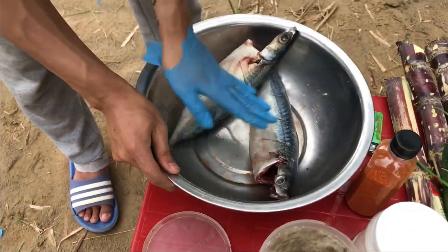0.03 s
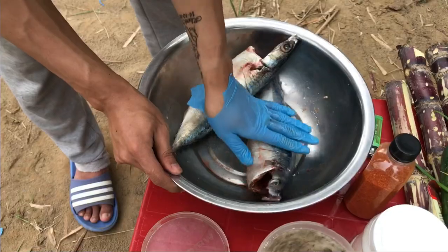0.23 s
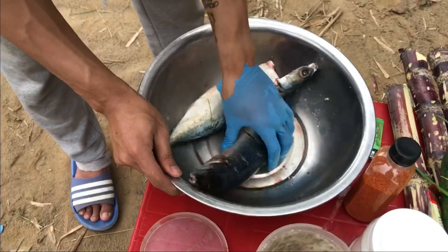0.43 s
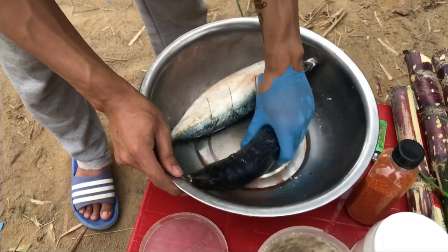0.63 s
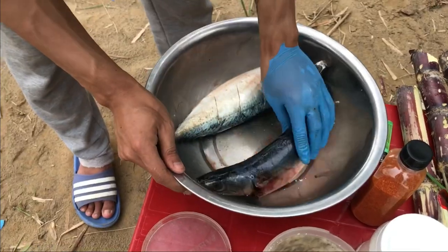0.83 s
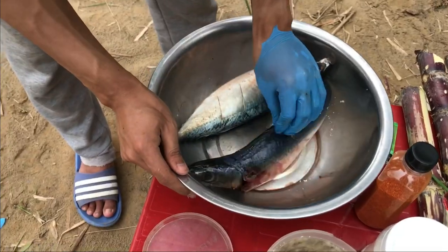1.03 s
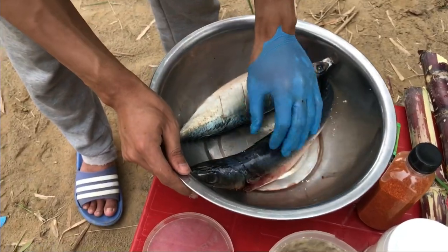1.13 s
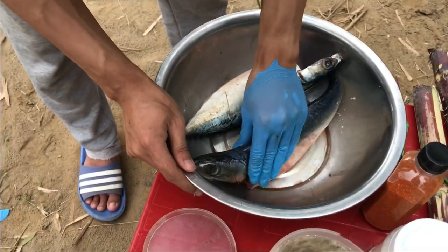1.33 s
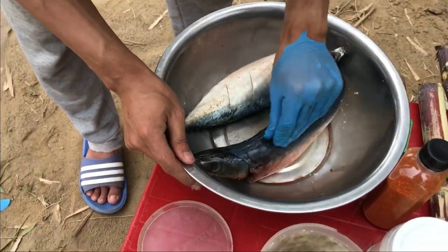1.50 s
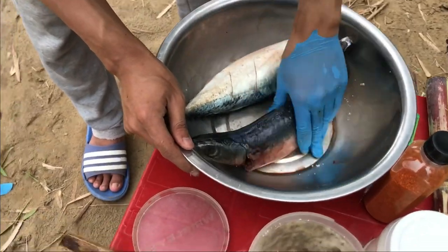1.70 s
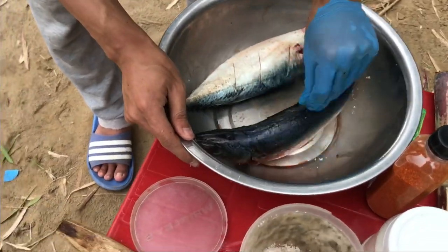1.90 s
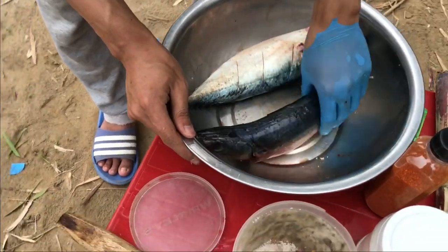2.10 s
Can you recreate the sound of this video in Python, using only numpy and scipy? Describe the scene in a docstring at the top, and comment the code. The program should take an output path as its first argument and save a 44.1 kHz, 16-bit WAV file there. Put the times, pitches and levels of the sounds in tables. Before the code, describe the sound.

A wet fish slaps down in a steel bowl twice, the first harder, each with a brief damped ring. Soft sliding, wet ticks and dull bumps come between, heard close over faint outdoor rumble and hiss.

```python
"""A yard with walls nearby: a gloved hand turns a wet fish over in a steel bowl and twice slaps it down.
Each slap is a pop of trapped air, a wet crack and a short, damped ring of the bowl. Between the slaps
the fish slides, ticks and bumps about, and the bowl thuds on the table. The walls throw back a short
echo. Underneath sit a low, wobbling boom and faint outdoor rumble and hiss."""
import sys
import numpy as np
from scipy import signal
from scipy.fft import rfft, irfft
from scipy.io import wavfile

SR = 44100
rng = np.random.default_rng(int(sys.argv[2]) if len(sys.argv) > 2 else 0)


def unload_wav(signal):
    """Save mono or channel-first audio to the path in sys.argv[1] as 16-bit WAV at rate SR, clipped to [-1, 1]."""
    wavfile.write(
        sys.argv[1],
        SR,
        np.round(np.clip(np.atleast_2d(signal).T, -1, 1) * 32767).astype(np.int16),
    )


N = 94815
T = np.arange(N) / SR


def amp(db):
    return 10 ** (np.asarray(db) / 20)


def unit_rms(x):
    return x / np.sqrt(np.mean(x ** 2))


def noise():
    return rng.standard_normal(N)


def shape(x, gain):
    """Filter by a gain that is a function of frequency."""
    hz = np.maximum(np.fft.rfftfreq(N, 1 / SR), 1)
    return irfft(rfft(x) * gain(hz), N)


def colour(x, points, tilt_db=0):
    """EQ through (Hz, dB) points, tilted per octave; rms 1."""
    hz, db = np.array(points).T
    def gain(f):
        octaves = np.log2(np.maximum(f, hz[0]))
        return amp(np.interp(np.log(f), np.log(hz), db) + tilt_db * octaves)
    return unit_rms(shape(x, gain))


def resonate(x, hz, width):
    """One steep-sided resonance, its width a share of its centre; rms 1."""
    return unit_rms(shape(x, lambda f: 1 / (1 + 1j * (f / hz - hz / f) / width) ** 2))


def wander(rate_hz):
    """Smooth random modulation; rms 1."""
    return unit_rms(shape(noise(), lambda f: np.exp(-(f / rate_hz) ** 2)))


def strike(at, rise_s, t60):
    """Envelope with a quick attack and a tail that falls 60 dB in t60 seconds."""
    age = np.maximum(T - at, 0)
    return (1 - np.exp(-age / rise_s)) * np.exp(-np.log(1000) * age / t60)


def ring(at, hz, rise_s, t60, phase=0):
    """One damped vibration."""
    return strike(at, rise_s, t60) * np.sin(2 * np.pi * hz * (T - at) + phase)


def contacts(table, rise_s, width):
    """Short noise bursts, each through one resonance."""
    return sum(amp(db) * strike(at, rise_s, t60) * resonate(noise(), hz, width)
               for at, db, hz, t60 in table)


# Tone of the outdoor rumble and hiss. Each row: frequency in Hz, relative level in dB.
RUMBLE_EQ = [(20, -17), (35, 0.5), (52, 4), (90, 2), (150, -8), (220, -11.5), (320, -26), (500, -62),
             (1000, -44.5)]
HISS_EQ = [(200, 12), (600, -2), (1200, 0.5), (2300, -6.5), (5000, -7.5), (9000, -17), (16000, -17)]
def outdoor_air():
    """A steady bed of low rumble and faint hiss."""
    return amp(-41.5) * colour(noise(), RUMBLE_EQ) + amp(-57.5) * colour(noise(), HISS_EQ)


# The yard's echo in adjoining bands. Each row: upper edge in Hz, level in dB, t60 in seconds.
ECHO_BANDS = [(451, -9.5, 0.37), (1600, -7.5, 0.28), (2700, -4, 0.23), (3900, -5.5, 0.32),
              (10400, -5, 0.27), (19000, -6, 0.34)]
def yard_echo(x):
    """Nearby walls return dense reflections that die away quickly."""
    response, low_hz = 0, 107.5
    for high_hz, db, t60 in ECHO_BANDS:
        band = shape(noise(), lambda f: (f >= low_hz) & (f < high_hz))
        tail = band * strike(at=0.0038, rise_s=0.0017, t60=t60)
        unity_gain = np.sqrt(2 * (high_hz - low_hz) / SR / np.sum(tail ** 2))
        response += amp(db) * unity_gain * tail
        low_hz = high_hz
    return signal.fftconvolve(x, response)[:N]


# Level curve of the boom. Each row: time in seconds, level in dB.
BOOM_LEVELS = [(0, -42.5), (0.05, -38.5), (0.2, -47.5), (0.25, -30.5), (0.32, -32), (0.36, -39.5),
               (0.53, -40.5), (0.6, -80), (0.79, -52), (0.825, -29.5), (0.91, -29.5), (0.99, -30),
               (1.07, -39), (1.18, -34), (1.25, -55), (1.55, -52), (1.85, -74), (2.15, -53)]
def boom():
    """A low, wavering tone that swells while the fish is pushed around."""
    hz = 61.4 * (1 + 0.04 * wander(rate_hz=14.6))
    db = np.interp(T, *np.array(BOOM_LEVELS).T) + 1.5 * wander(rate_hz=26)
    return np.sqrt(2) * amp(db) * np.sin(2 * np.pi * np.cumsum(hz) / SR)


def slips(per_second=8300, spread_db=3):
    """Wet skin slips in tiny jerks: a dense grain of uneven clicks."""
    clicks = (rng.random(N) < per_second / SR) * np.sign(noise())
    return clicks * amp(spread_db * np.minimum(rng.exponential(size=N), 6))


# Tone of the sliding rasp. Each row: frequency in Hz, relative level in dB.
RASP_EQ = [(300, -13.5), (900, -8), (2000, -5), (3400, -3), (4200, -3.5), (5200, -3.5), (8000, -9.5),
           (9300, -1), (10400, -10), (12500, -3.5), (16000, -9.5)]
# Strokes over wet steel. Each row: start in seconds, length in seconds, rasp level in dB,
# rasp tilt in dB per octave, hiss level in dB, squeak level in dB.
STROKES = [(0.01, 0.091, -59, -2, -60, -59), (0.066, 0.21, -56, 0, -56, -64.5),
           (0.238, 0.067, -54, -3.5, -67, -65), (0.302, .11, -52, -1, -55.5, -58.5),
           (0.364, 0.074, -45.5, -3, -65, -52), (0.427, 0.016, -45, -5, -38, -64),
           (0.655, 0.2, -54, 1.5, -51.5, -64), (0.814, 0.11, -56.5, -1.5, -60, -59),
           (1.074, 0.053, -57, -1, -63, -72), (1.133, 0.16, -55.5, -1.5, -58.5, -58.5),
           (1.268, 0.071, -49.5, 0, -83, -58.5), (1.285, 0.13, -61, -3.5, -67, -64.5),
           (1.463, .08, -57, -1.5, -62.5, -63.5), (1.557, 0.053, -50, 0.5, -63, -53),
           (1.68, 0.26, -57, -2.5, -53.5, -63.5), (1.938, 0.098, -50.5, 1, -50.5, -60),
           (1.986, 0.24, -59.5, -4.5, -64.5, -59.5), (2.135, 0.029, -44, -3, -41.5, -72)]
def slides():
    """Fish and glove rasp, hiss and squeak over the steel, swelling and fading with each stroke."""
    attack, release = 0.38, 0.56  # shares of a stroke's length
    hiss = resonate(slips(), hz=5700, width=0.54)
    steel_tone = amp(-11.5) * resonate(slips(), hz=5280, width=0.016)
    squeak = resonate(slips(), hz=3063, width=0.17) + steel_tone
    flutter = amp(1.5 * wander(rate_hz=56))
    out = 0
    for at, length, rasp_db, tilt_db, hiss_db, squeak_db in STROKES:
        progress = (T - at) / length
        swell = np.sqrt(np.clip(np.minimum(progress / attack, (1 - progress) / release), 0, 1))
        rasp = colour(slips(), RASP_EQ, tilt_db)
        out += swell * (amp(rasp_db) * rasp + amp(hiss_db) * hiss + amp(squeak_db) * squeak)
    return flutter * out


# Glove squeaks. Each row: start in seconds, level in dB, centre in Hz, t60 in seconds.
GLOVE_CATCHES = [(0.722, -42, 3230, 0.042), (0.785, -40, 2940, 0.024), (1.193, -43, 3100, 0.043),
                 (1.949, -42, 2860, 0.082)]
def glove_squeaks():
    """The glove catches and gives a short, narrow-band squeak."""
    return contacts(GLOVE_CATCHES, rise_s=0.00055, width=0.14)


# Wet ticks. Each row: start in seconds, level in dB, centre in Hz, t60 in seconds.
WET_TICKS = [(0.031, -43, 4040, 0.034), (0.074, -40, 11800, 0.016), (0.158, -29.5, 7540, 0.0049),
             (0.195, -34, 12400, 0.012), (0.265, -38, 4620, 0.033), (0.288, -41.5, 5550, 0.025),
             (0.3942, -13.5, 12100, 0.0043), (0.466, -46, 3800, 0.0055), (0.536, -36.5, 3030, 0.029),
             (0.597, -38.5, 8500, 0.0071), (0.785, -34.5, 3760, 0.025), (0.964, -44, 5560, 0.026),
             (1.008, -42.5, 6000, 0.0095), (1.193, -35, 1780, 0.017), (1.252, -42.5, 10300, 0.018),
             (1.565, -32.5, 12000, 0.01), (1.5875, -20.5, 8900, 0.0052), (1.593, -25, 3980, 0.0087),
             (1.624, -22, 3600, 0.011), (1.668, -38, 3520, 0.06), (1.699, -46, 7000, 0.024),
             (1.844, -48, 3940, 0.022), (1.925, -38, 9000, .006), (1.951, -49, 3970, 0.025),
             (1.968, -27, 2130, 0.005)]
def wet_ticks():
    """Wet skin and glove make small, bright ticks."""
    return contacts(WET_TICKS, rise_s=0.0012, width=0.91)


# Soft bumps. Each row: start in seconds, level in dB, centre in Hz, t60 in seconds.
FLESH_BUMPS = [(0.014, -42, 200, 0.061), (0.034, -42, 530, 0.058), (0.092, -43, 227, .04),
               (0.287, -36, 1090, 0.017), (0.437, -25.5, 192, 0.24), (0.486, -35, 1200, 0.044),
               (0.565, -39.5, 1180, 0.035), (0.632, -66, 700, 0.015), (0.657, -47.5, 694, 0.05),
               (0.706, -30.5, 200, 0.022), (0.708, -56, 1010, 0.016), (0.722, -38.5, 238, 0.057),
               (0.785, -42, 408, 0.037), (1.345, -50, 158, 0.14), (1.594, -28, 145, 0.33),
               (1.600, -21.5, 715, 0.024), (1.615, -23, 300, 0.048), (1.628, -29.5, 1280, 0.03),
               (1.639, -27, 630, 0.045), (1.681, -37.5, 510, 0.09), (1.702, -30, 219, 0.016),
               (1.957, -28, 505, 0.028), (1.967, -36, 594, 0.031)]
def flesh_bumps():
    """Flesh and hand bump the bowl with dull, broad knocks."""
    return contacts(FLESH_BUMPS, rise_s=0.00087, width=2.02)


# Heavy thuds. Each row: start in seconds, level in dB, pitch in Hz, t60 in seconds.
TABLE_THUDS = [(0.038, -28, 43, 0.099), (0.094, -24, 64.5, 0.14), (1.689, -27, 59.6, 0.073),
               (1.955, -20, 69.6, 0.13), (1.961, -23.5, 144.6, 0.083), (1.958, -24, 252, 0.074),
               (2.043, -27.5, 126, 0.051)]
def table_thuds():
    """The bowl rocks down and thuds through the table."""
    return sum(amp(db) * ring(at, hz, rise_s=0.0034, t60=t60) for at, db, hz, t60 in TABLE_THUDS)


# Modes of the loaded bowl. Each row: pitch in Hz, relative level in dB, t60 in seconds.
BOWL_MODES = [(163.2, -4.5, 0.57), (241, -3, 0.34), (283, -8.5, 0.33), (513, 1, 0.27), (612, 1, 0.29),
              (658, 0.5, .22), (805, -4.5, 0.1), (1117, -3.5, 0.34), (1227, -4, 0.28), (1300, -7.5, 0.25),
              (2370, 0, .16), (2664, -4, .18), (2777, 0, 0.17), (5730, -4, .15)]
def bowl_ring(hits):
    """The bowl rings briefly, damped by fish and hand; a slap with less crack rings duller."""
    out, hardest_db = 0, max(crack_db for *_, crack_db, _, _ in hits)
    for at, *_, crack_db, _, ring_db in hits:
        tilt_db = -0.3 * (hardest_db - crack_db)  # per octave above 700 Hz
        for hz, mode_db, t60 in BOWL_MODES:
            level = amp(ring_db + mode_db + tilt_db * max(np.log2(hz / 700), 0))
            out += level * ring(at, hz, rise_s=0.0021, t60=t60, phase=rng.uniform(0, 2 * np.pi))
    return out


# Tone of the wet crack. Each row: frequency in Hz, relative level in dB.
CRACK_EQ = [(200, -23), (600, 6), (1300, 8), (2100, -5), (2750, 0), (3100, -1.5), (3800, 0.5), (4300, -7),
            (4700, -4), (5700, -7.5), (8700, -13), (10400, -19), (11800, -13.5), (13500, -19), (16000, -23)]
def wet_crack(at, decay_s, rise_s=0.00024):
    """Wet skin hits steel: a very short burst, flattened in spectrum and then coloured."""
    envelope = strike(at, rise_s, decay_s)
    spectrum = rfft(noise() * envelope)
    flat_burst = irfft(spectrum / (np.abs(spectrum) + 1e-9), N)
    gate = np.sqrt(strike(at, rise_s, 2 * decay_s))  # keeps the flattened burst tight
    return colour(flat_burst * gate, CRACK_EQ) * np.sqrt(np.mean(envelope ** 2))


# The two slaps. Each row: start in seconds, pop level in dB, pop pitch in Hz, pop t60 in seconds,
# crack level in dB, crack decay in seconds, bowl ring level in dB.
FISH_SLAPS = [(0.4320, -5, 791, 0.018, -8.5, 0.014, -32), (1.5893, -11.5, 833, 0.018, -25.5, 0.03, -34)]
def fish_slaps():
    """Air pops out from under the fish, its wet skin cracks on the steel in two steps, and juice sprays."""
    out = 0
    for at, pop_db, pop_hz, pop_t60, crack_db, decay_s, _ in FISH_SLAPS:
        pop = ring(at, pop_hz, rise_s=0.00043, t60=pop_t60)
        crack = wet_crack(at, decay_s)
        crack += amp(-0.5) * wet_crack(at + 0.00185, decay_s)  # the rest of the body lands
        squirt = amp(-18.5) * strike(at + 0.0079, rise_s=0.0045, t60=0.11)
        spray = squirt * resonate(noise(), hz=2360, width=1.05)
        out += amp(pop_db) * pop + amp(crack_db) * (crack + spray)
    return out


def scene():
    """Mono mix: the slaps feed the echo in full, the handling sounds 6 dB down."""
    slaps = fish_slaps()
    handling = flesh_bumps() + wet_ticks() + glove_squeaks() + table_thuds()
    mix = outdoor_air() + bowl_ring(FISH_SLAPS) + handling + slaps
    echo = yard_echo(slaps + amp(-6) * handling)
    return (mix + echo + slides() + boom())[None]


def record(dry):
    """A steep low-pass takes off the very top."""
    low_pass = signal.ellip(10, 0.2, 70, 15900, fs=SR, output="sos")
    return signal.sosfilt(low_pass, dry)


dry = scene()
out = record(dry)
unload_wav(out)
```